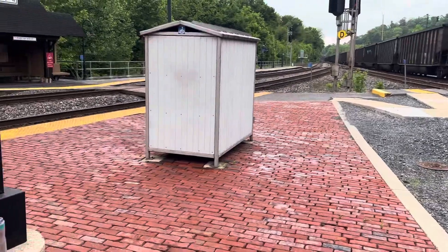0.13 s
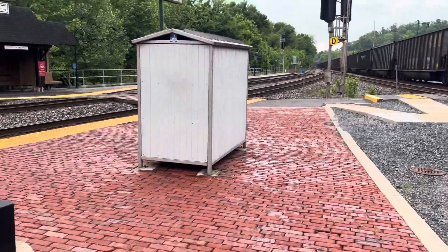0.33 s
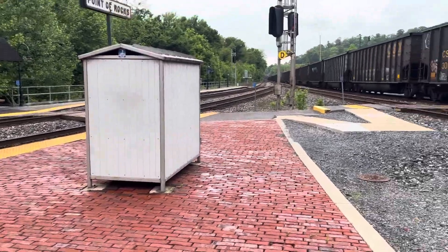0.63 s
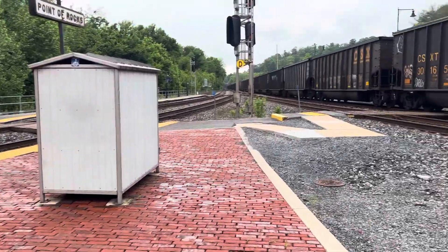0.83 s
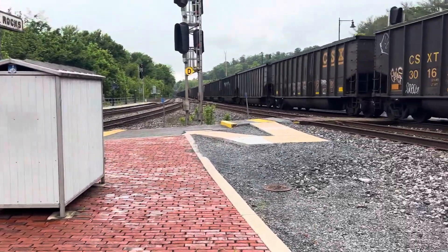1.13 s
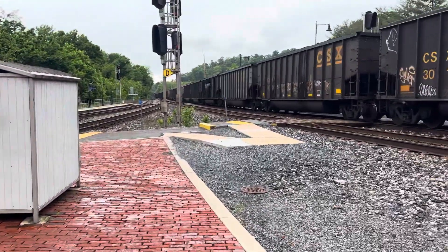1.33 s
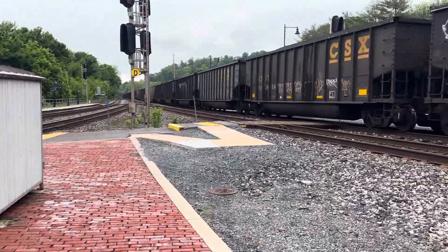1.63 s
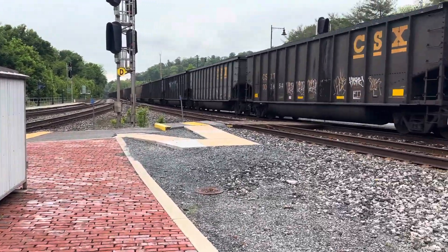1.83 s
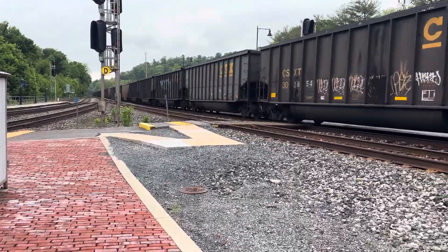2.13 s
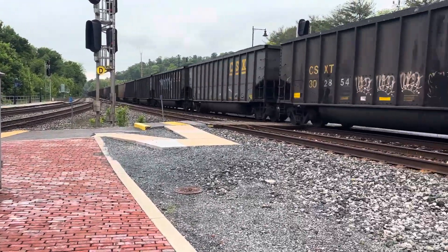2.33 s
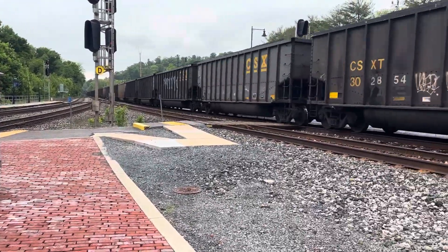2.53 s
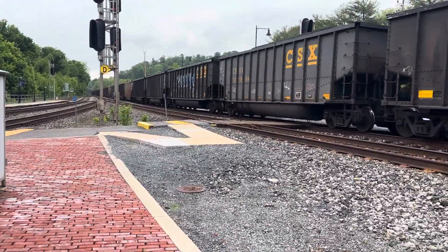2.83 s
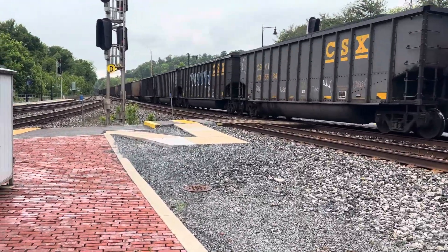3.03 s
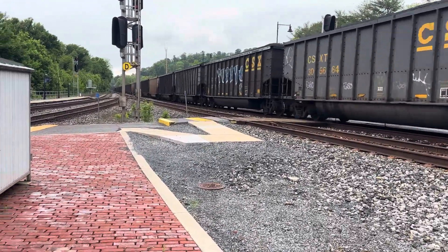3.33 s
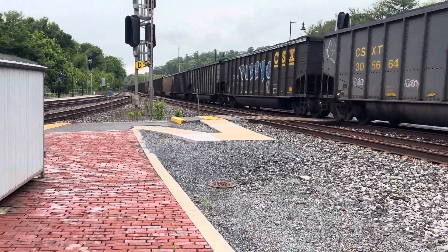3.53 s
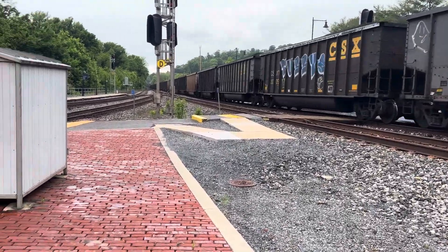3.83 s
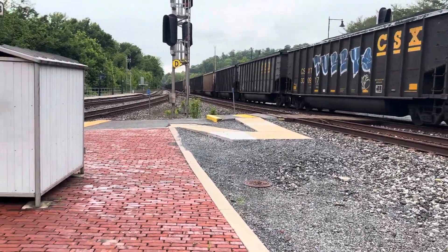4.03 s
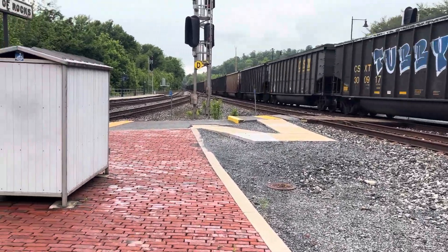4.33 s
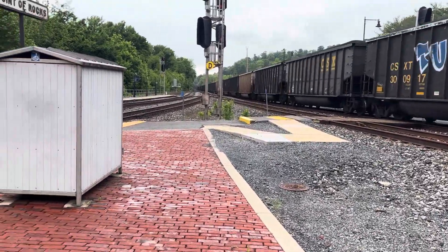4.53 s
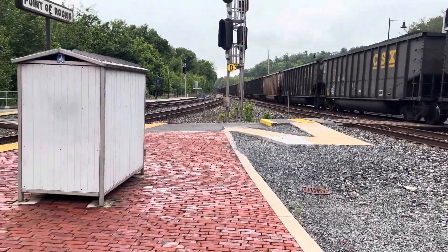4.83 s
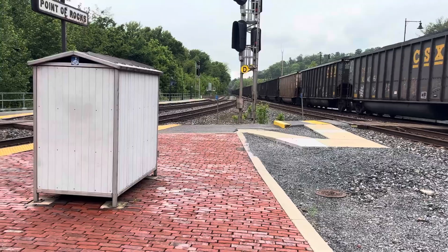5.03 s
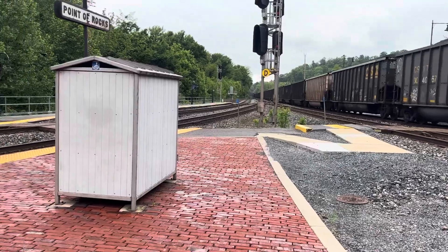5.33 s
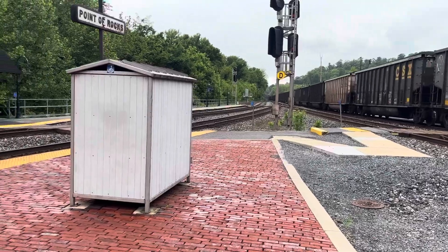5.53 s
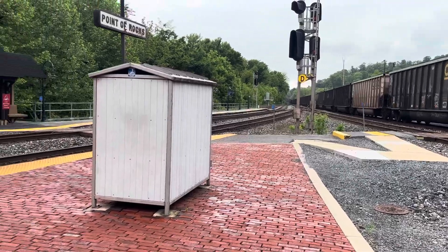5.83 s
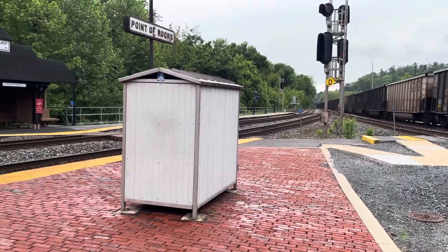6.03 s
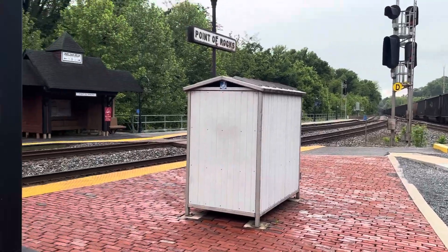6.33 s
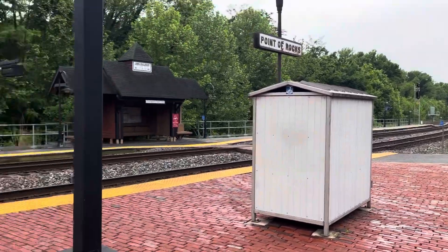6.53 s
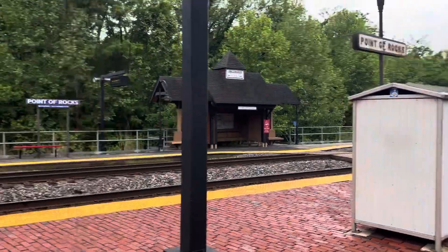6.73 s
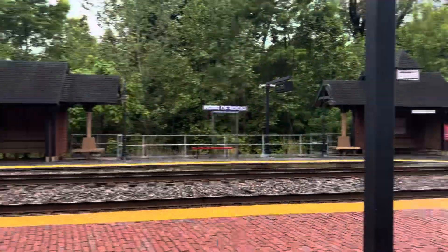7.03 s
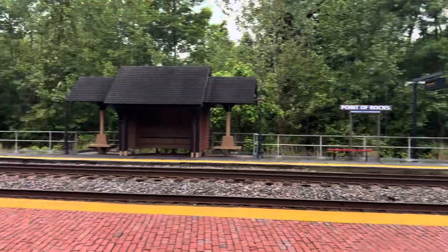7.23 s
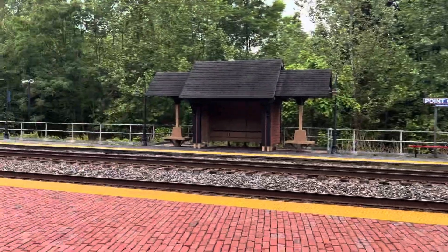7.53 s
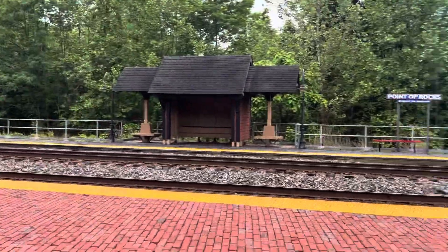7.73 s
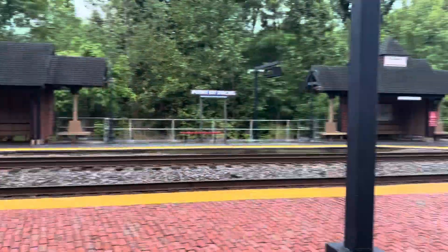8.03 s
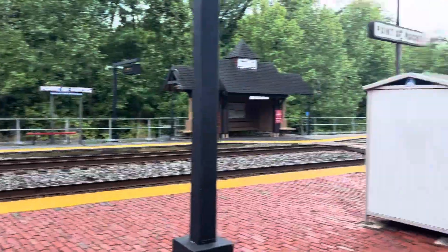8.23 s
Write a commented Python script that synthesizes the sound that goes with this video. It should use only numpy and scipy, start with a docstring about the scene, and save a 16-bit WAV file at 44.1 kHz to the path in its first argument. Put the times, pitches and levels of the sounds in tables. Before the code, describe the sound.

A long coal train grinds around a curve beside a platform, flanges hissing and wheels squealing over deep rumble, rail-joint knocks and a faint late horn.

```python
"""Wheel squeals and flange grinding ride over the rumble of a long coal train on a curve, from a platform.
Squeals are narrow stick-slip tones that sink in pitch; grinding is hiss in three registers with broad modes.
Coloured noise gives the rumble, roar and hollow drone, and gear clatters on the nearest trucks.
Wheels knock over a rail joint, each blow ringing damped modes. Near the end a far horn, a chord of sines,
sounds faintly."""
import sys
import numpy as np
from scipy import signal
from scipy.fft import rfft, irfft, next_fast_len
from scipy.io import wavfile
from scipy.ndimage import uniform_filter1d, map_coordinates

SR = 44100
rng = np.random.default_rng(int(sys.argv[2]) if len(sys.argv) > 2 else 0)


def transcribe(signal):
    """Save signal, clipped to [-1, 1], as a 16-bit WAV file at the path in sys.argv[1]."""
    frames = np.atleast_2d(signal).T
    limited = np.clip(frames, -1, 1)
    pcm = np.round(limited * 32767).astype(np.int16)
    wavfile.write(sys.argv[1], SR, pcm)


N = 369999
TIME = np.arange(N) / SR
SIZE = next_fast_len(N)
BINS = np.maximum(np.arange(SIZE // 2 + 1) * SR / SIZE, 1)   # frequency of every spectral bin (Hz)

# Partials of the far horn: pitch_hz, level_db (before wavering)
HORN_PARTIALS = [(508, -48.5), (635.2, -45), (952.8, -54), (1120, -61), (1276, -56)]
HORN_START_S, HORN_END_S, HORN_EDGE_S = 7.45, 7.9, .2   # the fades lie outside start and end

# Deep rumble, greater under the heavier cars: time_s, level_db (before RUMBLE_DB)
RUMBLE_LEVEL = [(0, -30), (0.7, -28), (1.4, -32.5), (2.1, -28.5), (3.0, -29.5), (3.45, -28), (3.85, -29.5),
                (4.45, -26.5), (5.0, -30.5), (5.8, -29.5), (6.2, -33), (6.55, -28.5), (7.45, -31.5),
                (8.2, -29.5)]
# Hollow drone of the car bodies: time_s, level_db (before DRONE_DB)
DRONE_LEVEL = [(0, -39), (1.65, -39.5), (1.85, -35), (2.35, -33), (2.5, -39.5), (3.05, -34), (3.6, -41.5),
               (4.55, -35), (4.88, -42.5), (5.1, -33.5), (5.55, -34.5), (6.25, -36.5), (6.7, -32),
               (7.3, -42.5), (8.39, -35.5)]
# Colour of the rumble: frequency_hz, relative_density_db (per Hz)
RUMBLE_COLOUR = [(20, -37), (32, -16), (45, -10.5), (72, 1), (100, -1.5), (130, -8.5), (200, -10.5),
                 (300, -17), (420, -22.5)]
# Colour of the rolling roar: frequency_hz, relative_density_db (per Hz)
ROAR_COLOUR = [(420, 3.5), (520, 0.5), (800, -6.5), (1050, -3.5), (1300, -7.5), (1600, -4.2)]
RUMBLE_DB, ROAR_DB, DRONE_DB, HUM_DB = 0, -42, -1, -46
RUMBLE_LOW_HZ = 30
# the two resonances of the car bodies
DRONE_HZ, DRONE_WIDTH_HZ, HUM_HZ, HUM_WIDTH_HZ = 352.4, 14.4, 74, 0.86

# Swell of the rolling noise at each pair of trucks, in passing order: swell_db
TRUCK_SWELLS = [5.2, 6.4, 6.2, 6.2, 3.8, 3.2, 2.5]
# paired trucks at the car ends: first passage, one car length, half-width of each swell
FIRST_TRUCKS_S, CAR_S, TRUCKS_PASS_S = 0.79, 1.192, 0.47
CLATTER_DB = -45   # loose gear, before the swell of the trucks

# Wheels over the rail joint: start_s, peak_db, rattle_decay_s (to 1/e), pitch_ratio
KNOCKS = [(0.258, -26.5, .006, 1), (1.481, -24, .016, .97), (2.646, -24.5, .007, 1),
          (2.956, -25.5, .007, .95), (3.098, -24.5, .009, .9), (3.78, -25.5, .022, 1.12),
          (3.869, -27, .009, .93), (4.423, -25.5, .006, 1.05), (5.034, -21.5, .012, 1),
          (6.256, -23.5, .012, 1.02)]
# Rail and truck modes; low ones build up late and last longer:
# pitch_hz (before pitch_ratio), relative_level_db, t60_s, build_up_s
JOINT_MODES = [(367, -4, 0.33, 0.074), (489, -6, 0.186, 0.032), (642, -3.5, 0.052, 0.016),
               (778, -6.5, .04, 0.0099), (850, -5.5, 0.015, .001), (985, -4.5, 0.03, 0.00025),
               (1086, -6, 0.023, 0.00052), (1236, -10, 0.017, .0004), (1890, -3, 0.0089, 0.00026)]
JOINT_LAG_S = .00009   # the joint lies nearly straight ahead: its sound reaches the left only this much later

# Flanges bearing on the rail: time_s, scrape_db, grind_db, hiss_db (before the three levels below)
FLANGES = [(0, -23.5, -27, -24), (0.14, -28.5, -35, -29), (0.45, -26.5, -31, -24.5),
           (0.78, -21.5, -27.5, -21.5), (1.3, -23, -30, -19.5), (1.85, -25.5, -32.5, -26.5),
           (2.43, -29.5, -32.5, -27), (2.53, -33.5, -37.5, -33.5), (3.06, -29.5, -35.5, -30),
           (3.12, -26.5, -32, -23.5), (3.55, -26, -31, -23), (4.05, -26, -32.5, -28),
           (4.35, -27, -31, -25.5), (4.56, -32, -37, -28.5), (4.76, -31.5, -39, -26),
           (4.87, -33, -39.5, -32), (5.55, -35.5, -35.5, -37), (5.8, -39.5, -41, -40),
           (6.02, -31, -35.5, -27.5), (6.17, -34, -37, -36), (6.7, -32.5, -36.5, -33.5),
           (7.05, -33, -39, -35), (7.4, -38, -43.5, -43.5), (7.7, -31.5, -40, -36.5), (8.0, -29, -34, -27),
           (8.39, -28, -34.5, -23)]
GRIND_DB, SCRAPE_DB, HISS_DB = 0, -2.54, -3   # low, middle and top register
# Colour of the flange friction: frequency_hz, relative_density_db (per Hz)
FRICTION_COLOUR = [(1600, 0.5), (2300, 0), (2800, 1), (3400, -0.5), (4600, 5.5), (5400, 3), (6200, 4.5),
                   (6700, 1.5), (7900, -2.5), (9200, 7), (9700, 7.5), (11500, 6.5), (14000, 5),
                   (15600, 5.5)]
# Broad wheel modes in the low register: middle_s, length_s, pitch_hz (at the middle), width_hz,
# level_db (against the hiss, before MODES_DB)
LOW_MODES = [(1.3, 1.2, 2380, 110, -12), (1.9, 2.2, 2820, 110, -14), (6.2, 4.4, 2560, 80, -11.5),
             (5.65, 1, 2420, 230, -9), (6, 3.4, 3410, 90, -15)]
# The same in the middle register: middle_s, length_s, pitch_hz, width_hz, level_db
MIDDLE_MODES = [(0.8, 1.6, 3990, 45, -18), (1, 1, 4800, 190, -9), (1.3, 2.2, 6100, 130, -13),
                (4, 3.3, 6270, 110, -11), (4.45, 1.9, 5380, 75, -14), (3.7, 3, 4480, 170, -11),
                (7.1, 2.6, 5920, 110, -13), (7.1, 2.4, 5140, 90, -15), (6.75, 2.6, 4330, 140, -8)]
# The same in the top register: middle_s, length_s, pitch_hz, width_hz, level_db
TOP_MODES = [(0.8, 1.6, 11660, 90, -16), (3.6, 1.4, 9850, 120, -16), (3.5, 1.1, 11550, 220, -12),
             (3.2, 1.7, 14980, 250, -13), (5.05, 0.7, 15000, 110, -14), (6.9, 1.9, 14500, 220, -11),
             (7.1, 1.4, 15130, 130, -15), (7.3, 2, 9960, 100, -12), (7.85, 1.1, 12450, 140, -14)]
MODES_DB = 1
MODE_FALL = .022   # share of its pitch that a broad mode loses per second
# countless weaker modes make the hiss patchy: depth, width and life of a patch
PATCH_DB, PATCH_HZ, PATCH_S = 3.2, 65, .08

# Loudest wheel squeals: loudest_s, length_s, pitch_hz (when loudest), width_hz, mean_level_db (before SQUEAL_DB)
WHEEL_SQUEALS = [(0.036, 0.068, 4490, 110, -29), (0.1, 0.34, 3190, 28, -42.5), (0.15, 0.36, 2215, 30, -44),
                 (0.255, 0.05, 2200, 130, -37), (0.301, 0.22, 6225, 70, -35.5), (0.8, 0.24, 4900, 170, -34),
                 (0.898, 0.8, 9680, 150, -37), (0.878, 0.5, 8750, 130, -35), (0.951, 0.34, 2970, 30, -35.5),
                 (1.019, 0.22, 4110, 45, -40), (1.026, 0.16, 4880, 110, -34.5), (1.11, 0.22, 2775, 35, -34),
                 (1.208, 0.14, 4760, 120, -34), (1.22, 0.2, 12345, 45, -37), (1.23, 0.24, 13380, 70, -36),
                 (1.3, 0.2, 12695, 45, -40), (1.351, 0.1, 4680, 55, -35.5), (0.91, 0.12, 2390, 45, -35.5),
                 (1.22, 0.26, 2358, 35, -38.5), (1.546, 0.1, 2337, 29.5, -38), (1.8, 0.22, 2345, 40, -40.5),
                 (1.39, 0.18, 6070, 70, -36), (2.049, 0.35, 4110, 40, -42.5), (2.11, 0.26, 3275, 24, -37.5),
                 (2.41, 0.12, 3230, 30, -44), (2.35, 0.22, 1985, 40, -39), (2.353, 0.19, 2230, 30, -39),
                 (2.479, 0.1, 4024, 25, -40), (2.44, 0.18, 5020, 45, -38), (2.752, 0.12, 1963, 40, -39.5),
                 (3.135, 0.076, 4380, 45, -31), (3.19, 0.14, 4757, 50, -36), (3.218, 0.25, 4026, 30, -38),
                 (3.27, 0.2, 5030, 45, -36), (3.3, 0.3, 4481, 55, -39), (3.36, 0.18, 4700, 50, -38),
                 (3.529, 0.55, 11620, 95, -31.5), (3.639, 0.22, 4950, 45, -36), (3.66, 0.36, 3955, 20, -35),
                 (3.7, 0.18, 4655, 50, -32.5), (3.701, 0.18, 4425, 35, -38), (3.65, 0.12, 8950, 60, -38),
                 (3.72, 0.5, 2195, 28, -41), (3.95, 0.18, 4880, 40, -38.5), (3.915, 0.12, 4634, 20, -26),
                 (3.911, 0.16, 4390, 28, -34), (4.7, 0.28, 5280, 70, -39.5), (4.452, 0.5, 13790, 64, -43),
                 (4.778, 0.3, 13641, 45, -35), (4.75, 0.2, 11080, 70, -41), (4.75, 0.2, 11400, 90, -42),
                 (4.72, 0.25, 12320, 60, -44), (5.66, 0.12, 2200, 40, -44), (6.03, 0.24, 2190, 30, -44),
                 (5.968, 0.18, 4361, 70, -44), (6.1, 0.2, 4540, 45, -41.5), (6.45, 0.22, 5170, 65, -44),
                 (6.62, 0.18, 6090, 85, -39.5), (6.7, 0.16, 5821, 40, -45), (7.06, 0.26, 6020, 55, -45),
                 (7.55, 0.45, 12600, 55, -52), (8.222, 0.58, 9780, 130, -35.5),
                 (8.283, 0.4, 5760, 130, -36), (8.219, 0.6, 5300, 330, -38), (8.269, 0.51, 6550, 300, -34)]
SQUEAL_DB = 2
SQUEAL_SWELL = .5   # share of its length in which a squeal builds up
DOPPLER_FALL = .03   # share of its pitch that a passing wheel loses per second

# Phase step between the microphones: frequency_hz, left_lead_rad
LEFT_LEAD = [(20, 0.6), (250, -.4), (700, -1.5), (1100, -1.8), (1450, -3.1), (2000, -4.6), (2350, -6.4),
             (3000, -7.3), (3700, -9.4), (4100, -12.6), (5000, -14), (5450, -16.2), (6100, -16.5),
             (7400, -15.7), (8400, -15.4), (10800, -12.7), (14100, -12.4), (15700, -10.4)]
# Likeness of the two sides: frequency_hz, likeness (0-1)
LIKENESS = [(60, 1), (150, .93), (360, 0.76), (520, 0.54), (950, 0.38), (1550, 0.61), (2000, 0.36),
            (2300, 0.74), (2950, 0.47), (3700, .2), (4200, 0.21), (4600, 0.48), (5200, 0.23), (5600, 0.64),
            (6100, 0.35), (6700, 0.25), (7000, 1), (8100, 1), (9300, 0.21), (10200, 0.71), (11200, 1),
            (15600, 0.98)]
# Level of the left over the right: frequency_hz, balance_db
BALANCE = [(60, -1), (83, 0), (110, -2), (160, 0), (220, -1.5), (300, -0.5), (420, -1), (580, -3),
           (810, -2.5), (1120, -0.5), (1540, 2.5), (2140, 3), (2960, 0), (4090, -3), (5660, -3),
           (7830, 0.0), (10800, 0.0), (15000, 0.0)]
CUTOFF_HZ = 15900


def from_db(db):
    """Decibels to gain."""
    return 10 ** (np.asarray(db) / 20)


def rms_one(x):
    """Scale to unit power."""
    return x / np.sqrt(np.mean(np.abs(x) ** 2) + 1e-20)


def in_time(rows):
    """One control signal for each column of a curve table."""
    s, *columns = np.transpose(rows)
    return [np.interp(TIME, s, c) for c in columns]


def at_hz(points, hz):
    """Read a table on a log-frequency axis."""
    f, value = np.transpose(points)
    return np.interp(np.log(hz), np.log(f), value)


def drift(rate, size=N):
    """Random wander of spread about 1 that takes a new course `rate` times a second."""
    steps = np.arange(size) * rate / SR
    knots = rng.standard_normal(int(steps[-1]) + 2)
    # straight lines between the knots lose power; the factor restores it
    return np.sqrt(3 / 2) * np.interp(steps, np.arange(len(knots)), knots)


def band(low_hz, high_hz, order=8):
    """Gain of a band-pass at every bin, steeper with a higher order."""
    return 1 / np.sqrt((1 + (low_hz / BINS) ** (2 * order)) * (1 + (BINS / high_hz) ** (2 * order)))


def resonance(hz, width_hz):
    """Gain of a steep-sided resonance at every bin."""
    return 1 / (1 + ((BINS - hz) / width_hz) ** 2)


def noise(gain):
    """Two unrelated noises of one colour: the direct and the scattered sound."""
    spectrum = rfft(rng.standard_normal((2, SIZE))) * gain
    return rms_one(irfft(spectrum, SIZE)[:, :N])


def add(out, start, sound):
    """Mix a sound in from a given sample on."""
    sound = sound[:, :max(N - start, 0)]
    out[:, start:start + sound.shape[1]] += sound


def horn():
    """A far chord of sines, wavering in level and phase on its way through the air."""
    waver_db, waver_per_s, smear_per_s = 2.5, 11, 22
    corners_s = [HORN_START_S - HORN_EDGE_S, HORN_START_S, HORN_END_S, HORN_END_S + HORN_EDGE_S]
    gate = np.interp(TIME, corners_s, [0, 1, 1, 0])
    chord = np.zeros(N)
    for hz, db in HORN_PARTIALS:
        level = from_db(db + waver_db * drift(waver_per_s))
        chord += level * np.sin(2 * np.pi * hz * TIME + drift(smear_per_s) / 2)
    return np.sqrt(2) * gate * chord


def truck_swell():
    """Decibels by which the rolling noise rises as each pair of trucks goes by."""
    swell_db = np.zeros(N)
    for k, db in enumerate(TRUCK_SWELLS):
        passing_s = FIRST_TRUCKS_S + k * CAR_S
        swell_db += db * np.exp(-((TIME - passing_s) / TRUCKS_PASS_S) ** 2)
    return swell_db


def sustained(x, hold_s=0.085, evenness=0.36):
    """A resonance that is fed all the time rings on without deep gaps."""
    power = uniform_filter1d(x ** 2, size=int(hold_s * SR) + 1, axis=1)
    return rms_one(x / (np.abs(power) + 1e-6) ** (evenness / 2))


def rolling(rattle_db=1.82, surge_db=0.88):
    """Rough treads shake track and cars: deep rumble, a rattling roar and two body resonances."""
    rumble_db, = in_time(RUMBLE_LEVEL)
    drone_db, = in_time(DRONE_LEVEL)
    rumble = noise(from_db(at_hz(RUMBLE_COLOUR, BINS)) * band(RUMBLE_LOW_HZ, 437))
    rumble *= from_db(rumble_db + RUMBLE_DB + surge_db * drift(8))
    roar = noise(from_db(at_hz(ROAR_COLOUR, BINS)) * band(449, 1970))
    roar *= from_db(ROAR_DB + truck_swell() + rattle_db * drift(55))
    drone = from_db(drone_db + DRONE_DB) * sustained(noise(resonance(DRONE_HZ, DRONE_WIDTH_HZ)))
    hum = from_db(HUM_DB) * noise(resonance(HUM_HZ, HUM_WIDTH_HZ))
    return rumble + roar + drone + hum


def clatter(rattle_db=2.5, low_hz=620, high_hz=1120):
    """Springs and brake gear rattle as banded noise that rises while a pair of trucks is close."""
    closeness = from_db(truck_swell()) - 1
    level = from_db(CLATTER_DB + rattle_db * drift(70))
    return level * closeness * noise(band(low_hz, high_hz, order=4))


def knocks(rattle=0.18):
    """A wheel drops into the joint: one sharp blow and a short rattle set off the damped rail and truck."""
    t, out = TIME[:SR // 3], np.zeros((2, N))
    for start_s, peak_db, rattle_s, pitch in KNOCKS:
        body = np.zeros(len(t))
        for hz, level_db, t60_s, rise_s in JOINT_MODES:
            envelope = from_db(level_db - 60 * t / t60_s) * (1 - np.exp(-t / rise_s))
            body += envelope * np.sin(2 * np.pi * (hz * pitch * t + rng.random()))
        shared, separate = rng.standard_normal(len(t)), rng.standard_normal((2, len(t)))
        contact = rattle * (shared + separate / 2) * np.exp(-t / rattle_s)
        contact[:, 0] += 2   # the sharp blow
        knock = signal.fftconvolve(contact, body[None], axes=1)
        add(out, int(start_s * SR), from_db(peak_db) * knock / np.abs(knock).max())
    left = np.interp(TIME - JOINT_LAG_S, TIME, out[0])
    return np.array([left, out[1]])


def wheel_tone(top, swell_s, fade_s, hz, width_hz, fall, locked_hz=20, skirt=0.12, skirt_width=4, edge_db=-10):
    """One wheel mode driven by stick and slip: it swells, flutters and sinks with the Doppler shift."""
    edge_s = .04
    start, end = top - swell_s, top + fade_s
    first = int(np.clip(start - edge_s, 0, TIME[-1] - edge_s) * SR)
    t = TIME[first:max(int((end + edge_s) * SR), first + 2)]
    edge = from_db(edge_db)
    swell = np.interp(t, [start - edge_s, start, top, end, end + edge_s], [0, edge, 1, edge, 0])
    phase = 2 * np.pi * (np.cumsum(hz * (1 - fall * (t - top))) / SR % 1)
    sine, cosine = np.sin(phase), np.cos(phase)
    # uneven slipping jostles the tone in strength and phase, which widens it
    rate = 2 * width_hz
    paths = np.zeros((2, len(t)))   # direct and scattered
    for path in paths:
        for wave in (sine, cosine):
            jostle = drift(rate, size=len(t)) + skirt * drift(skirt_width * rate, size=len(t))
            path += wave * jostle / 2
    # the narrower the squeal, the more of it locks into a pure tone
    paths[0] += locked_hz / width_hz * sine
    return first, rms_one(swell * paths)


def long_modes(rows):
    """Broad, rough modes that never lock into a tone."""
    out = np.zeros((2, N))
    for middle_s, length_s, hz, width_hz, db in rows:
        half_s = length_s / 2
        first, tone = wheel_tone(middle_s, half_s, half_s, hz, width_hz, MODE_FALL, locked_hz=0, edge_db=-0.5)
        add(out, first, from_db(db + MODES_DB) * tone)
    return out


def patchy(sound):
    """Many wheels ring briefly at once: narrow parts of the hiss come and go, sinking in pitch."""
    hz, t, frames = signal.stft(sound, SR, nperseg=1024)
    # a random map read along falling lines of pitch
    pitch_place = np.outer(hz, np.exp(MODE_FALL * t)) / PATCH_HZ
    time_place = 0 * pitch_place + t / PATCH_S
    random_map = rng.standard_normal((512, 256))
    chance = map_coordinates(random_map, [pitch_place, time_place], order=3, mode="mirror")
    gain = rms_one(from_db(PATCH_DB * np.tanh(chance)))
    return signal.istft(frames * gain, SR, nperseg=1024)[1][:, :N]


def grinding(chatter_db=0.56, flicker_db=0.74, grab_db=0.6):
    """Flange friction: a rough hiss in three registers that grabs and eases, with wheel modes ringing in it."""
    scrape_db, grind_db, hiss_db = in_time(FLANGES)
    colour = from_db(at_hz(FRICTION_COLOUR, BINS))
    chatter = chatter_db * drift(90)   # shared by all registers
    registers = [(1650, 3450, grind_db + GRIND_DB, LOW_MODES),
                 (3450, 7400, scrape_db + SCRAPE_DB, MIDDLE_MODES),
                 (7400, 16500, hiss_db + HISS_DB, TOP_MODES)]
    out = np.zeros((2, N))
    for low_hz, high_hz, level_db, modes in registers:
        friction = noise(colour * band(low_hz, high_hz)) + long_modes(modes)
        roughness_db = grab_db * drift(8) + chatter + flicker_db * drift(140)
        out += from_db(level_db + roughness_db) * friction
    return patchy(out)


def squeals():
    """The loud wheels, each singing for as long as its flange bears on the rail."""
    out = np.zeros((2, N))
    for top_s, length_s, hz, width_hz, db in WHEEL_SQUEALS:
        swell_s = SQUEAL_SWELL * length_s
        first, tone = wheel_tone(top_s, swell_s, length_s - swell_s, hz, width_hz, DOPPLER_FALL)
        add(out, first, from_db(db + SQUEAL_DB) * tone)
    return out


def microphones(sound):
    """Direct sound reaches both microphones with a phase step; scattered sound sets them apart."""
    direct, scattered = rfft(sound, SIZE)
    alike = at_hz(LIKENESS, BINS)
    sides = np.array([[1], [-1]])   # left, right
    pair = np.sqrt((1 + alike) / 2) * direct + sides * np.sqrt((1 - alike) / 2) * scattered
    phase_step = np.exp(.5j * sides * at_hz(LEFT_LEAD, BINS))
    balance = from_db(sides * at_hz(BALANCE, BINS) / 2)
    return irfft(pair * phase_step * balance, SIZE)[:, :N]


def scene():
    """The cars pass to the right of the microphones; the rail joint lies further ahead."""
    return microphones(horn() + rolling() + clatter() + grinding() + squeals()) + knocks()


def record(dry):
    """The top is cut steeply."""
    return irfft(rfft(dry, SIZE) * band(1, CUTOFF_HZ, order=100), SIZE)[:, :N]


dry = scene()
out = record(dry)
transcribe(out)
```